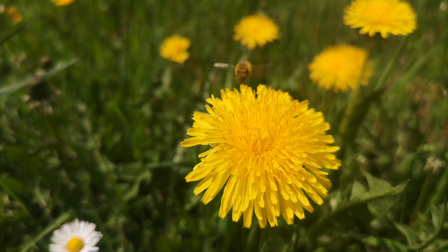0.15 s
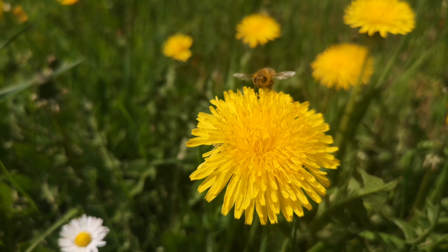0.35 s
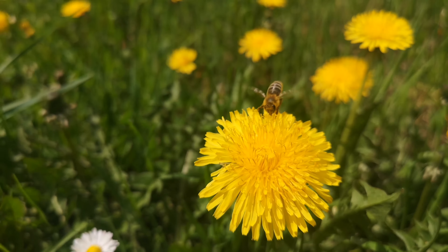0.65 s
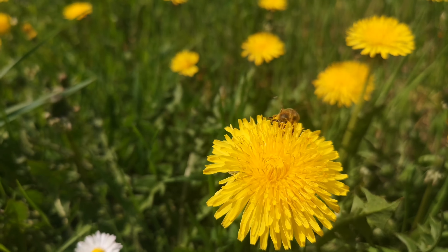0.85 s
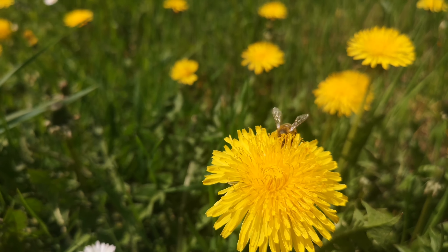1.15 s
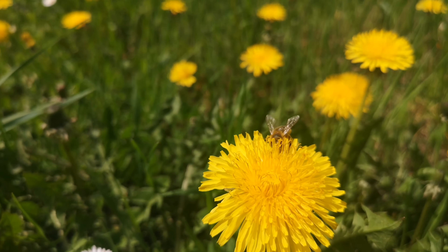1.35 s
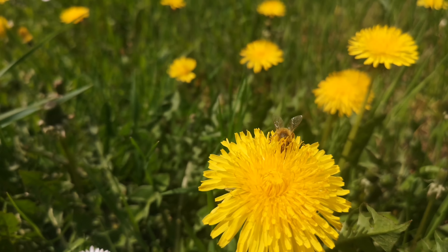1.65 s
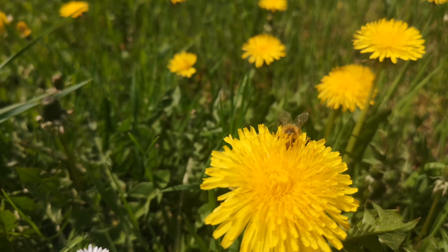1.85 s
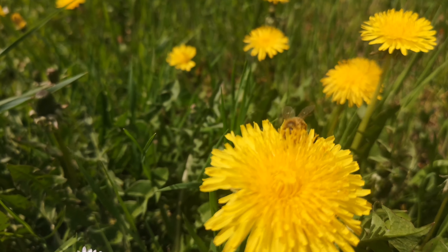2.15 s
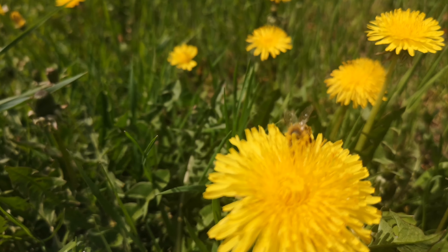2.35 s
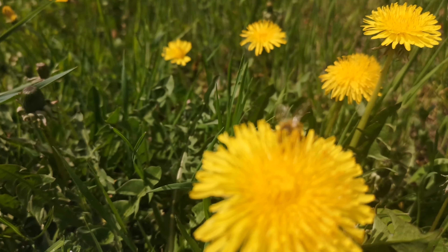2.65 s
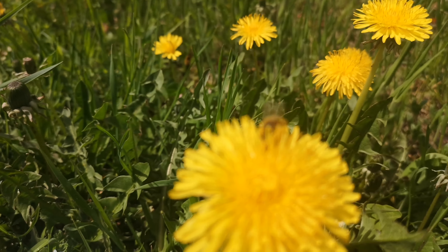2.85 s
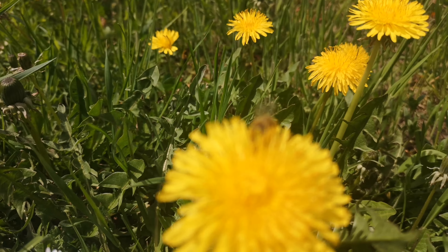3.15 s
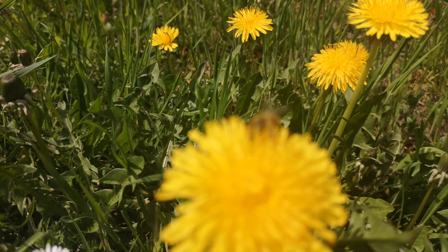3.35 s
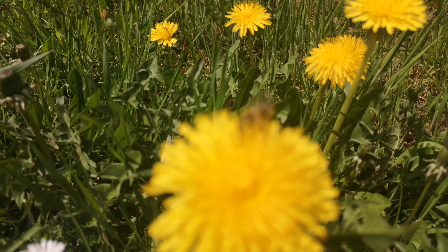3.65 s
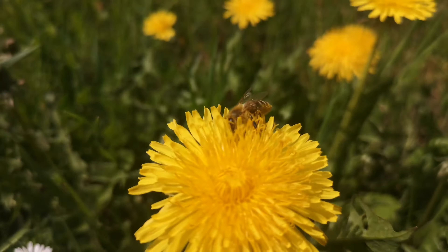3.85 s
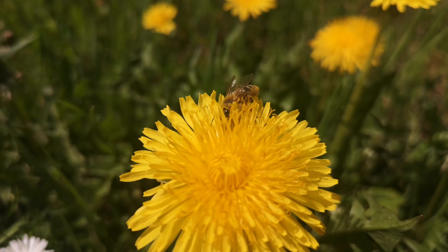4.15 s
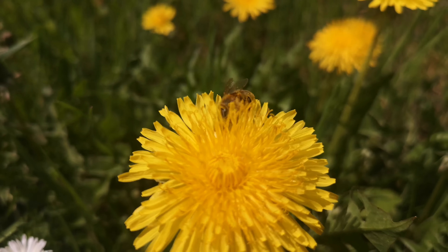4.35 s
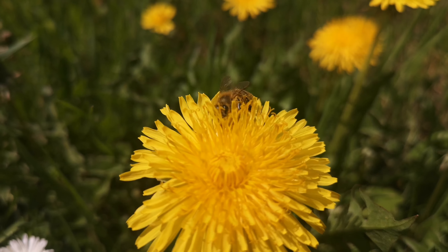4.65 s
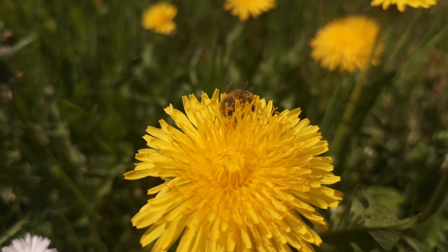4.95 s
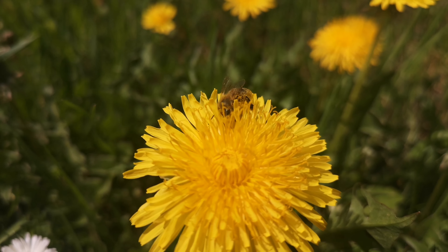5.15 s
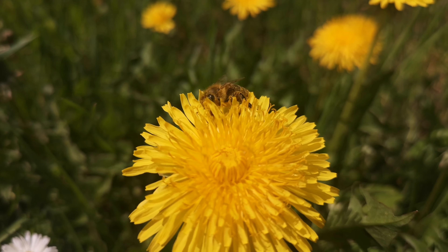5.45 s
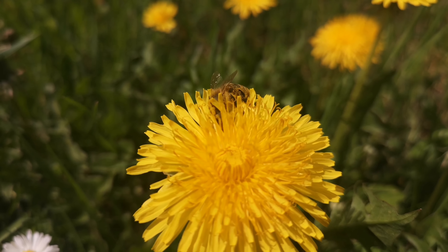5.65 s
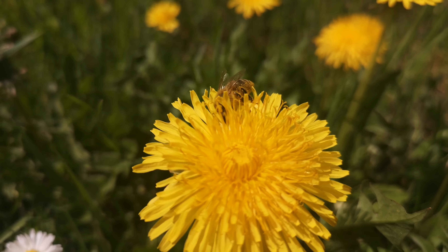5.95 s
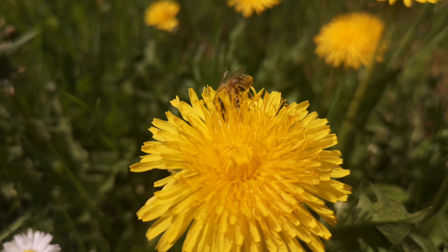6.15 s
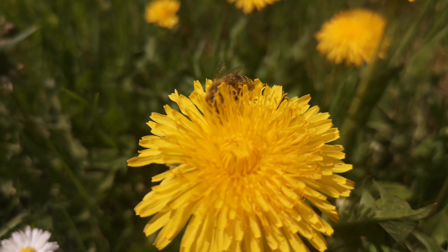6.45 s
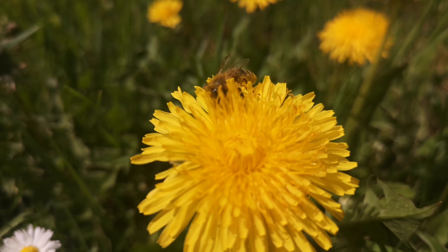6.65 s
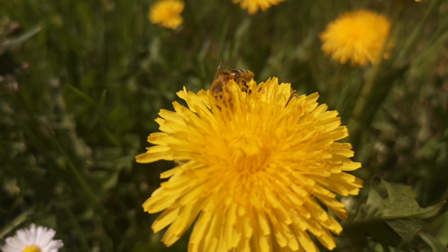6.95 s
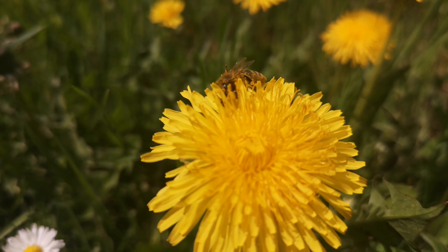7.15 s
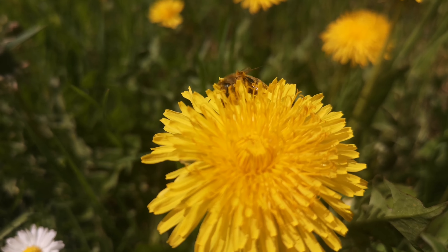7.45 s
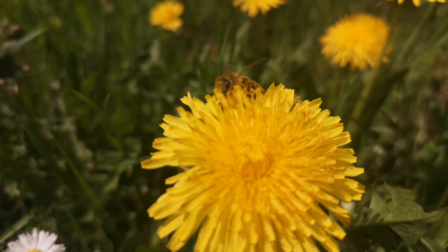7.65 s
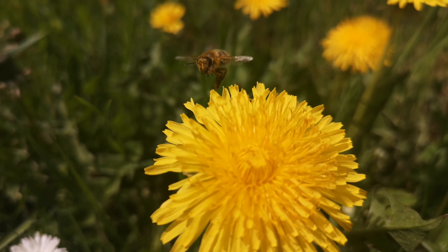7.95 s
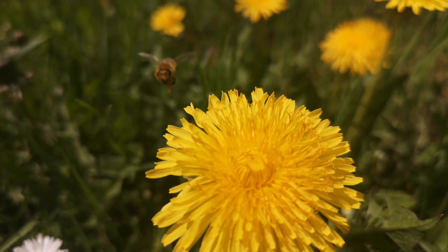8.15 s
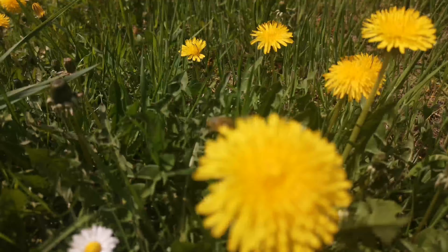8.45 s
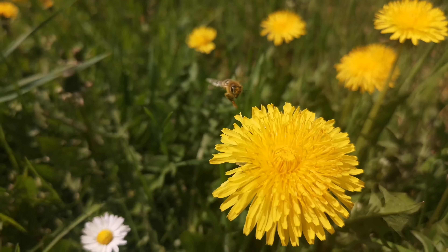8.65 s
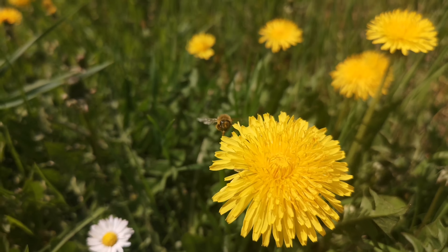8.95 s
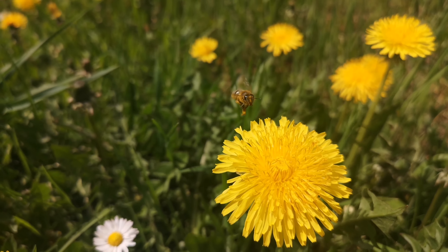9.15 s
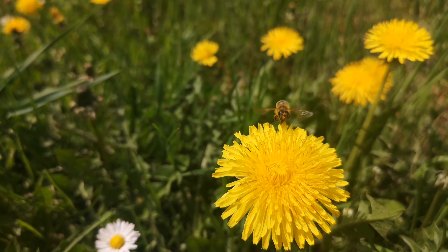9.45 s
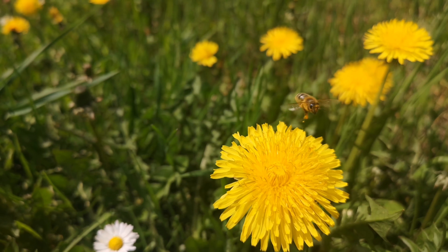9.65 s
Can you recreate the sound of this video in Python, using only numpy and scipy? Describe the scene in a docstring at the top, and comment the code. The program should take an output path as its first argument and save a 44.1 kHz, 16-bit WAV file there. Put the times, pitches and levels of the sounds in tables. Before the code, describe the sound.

Very close stereo perspective in an open meadow, with faint steady air hiss. From 0 to 2 seconds a honeybee hums near 200 hertz in fast, uneven swells, swinging left and right with a soft buzzing rasp; neighbours beat against it at slightly different pitches. Wing tips rattle at 0.2 to 0.5, with sharp cracks near 0.9, 1.5 and 1.8. More passes and a touch come at 2.5, then a broader hum and sibilant swish around 3 to 3.3. At 3.8 to 3.9 a hard cluster of cracks, dull pushes and flutter stands out. From 4 to 6.8 the buzz thins into softer passes, with a low puff near 5. At 7.1 to 7.8 it surges with rattles, thumps of air and a slow, sagging laboured buzz, stumbling until 8.5. A quiet lull follows; around 9.2 to 9.6 the hum swells again with two small hits.

```python
"""Honeybees close to a spaced pair

Honeybees work the flowers of a meadow, close to a spaced pair of microphones.
The nearest bee swells and fades as it darts about: sine hum and octave, with a rasp of wingbeat overtones.
Others hum around it at slightly different wingbeats, and one labours on slow, sagging strokes.
Wing tips rattle in noise ticks or strike with a crack and a dull push, and jolted wings flutter.
Shaped noise makes the swish of the strokes, the puffing wing wash and the faint hiss of the air."""
import sys
import numpy as np
from scipy.fft import rfft, irfft, next_fast_len
from scipy.io import wavfile
from scipy.ndimage import map_coordinates

SR = 44100
rng = np.random.default_rng(int(sys.argv[2]) if len(sys.argv) > 2 else 0)


def generate_wav(sig):
    """Save sig (samples, or channels by samples) to the path in sys.argv[1] as 16-bit PCM at SR."""
    pcm = np.round(np.clip(np.atleast_2d(sig).T, -1, 1) * 32767).astype(np.int16)
    wavfile.write(sys.argv[1], SR, pcm)


N = 431738
TIME = np.arange(N) / SR
USUAL_HZ, USUAL_DB = 200, -36  # reference wingbeat and hum level
SHUDDER_DB = 2.5  # beat-to-beat unevenness of the strokes


# Moments when the near bee faces the microphones and sounds nasal.
# Each row: centre in seconds, half length in seconds, level in dB.
NASAL_TURNS = [(1.405, .058, -60.5), (1.65, 0.031, -64.5), (2.3, 0.15, -69.5), (4.47, 0.037, -69),
               (6.8, 0.26, -79.5), (8.14, 0.23, -75)]
# The overtones of that nasal edge. Each row: frequency in Hz, relative level in dB.
NASAL_OVERTONES = [(600, -11), (1000, -0.5), (1400, -9.5), (1700, -7), (2020, -4.5), (2450, -18.5),
                   (3500, -20), (5000, -23.5)]
NASAL_DB = -81  # median of the nasal rasp that always remains, at the usual hum level


def near_bee(cycles):
    """The nearest bee swells at each pass; its rasp grows with hum and octave, and a nasal edge comes and goes."""
    hum_db, octave_db = closeness()
    _, pan_db = course()
    crowd_db, = curves(CROWD_LEVEL)
    rasp_gain = amp(octave_db - 19.0) + amp(hum_db - 32.0)
    rasp_db = decibels(rasp_gain) + 4.2 * wobble(20)
    turn = 0.38 + 0.047 * wobble(5.4)
    loose = unsteadiness()
    hum_db = hum_db + 2 * loose * wobble(30)
    octave_db = octave_db + 2 * loose * wobble(22)
    bee = wings(cycles, USUAL_HZ, hum_db, octave_db, rasp_db, turn, SHUDDER_DB * loose)
    lasting_edge = amp(NASAL_DB + crowd_db - USUAL_DB + 8.8 * wobble(9))
    edge = lasting_edge + swells(NASAL_TURNS, order=4)
    nasal = edge * rasp(cycles, USUAL_HZ, NASAL_OVERTONES)
    return panned(pan_db + 2.85 * wobble(14)) * bee + nasal


# Passes of the near bee as it darts close to the microphones, before its small random wavers.
# Each row: centre in seconds, half length in seconds, hum level in dB, octave level in dB,
# wingbeat in Hz, left-over-right level in dB.
NEAR_PASSES = [(0.046, 0.063, -30.5, -44, 204.2, 10.5), (0.218, 0.064, -37, -37.5, 208.7, -4),
               (0.351, 0.13, -34, -39, 198.5, 3.5), (0.596, 0.079, -28.5, -41, 195.4, 5.5),
               (0.692, 0.049, -45.5, -43, 206.1, 1), (0.939, 0.041, -40.5, -36, 203, -2),
               (1.01, 0.064, -33, -56, 199.4, -7), (1.398, 0.061, -33.5, -36, 195, 14.5),
               (1.64, 0.03, -39, -42, 210.6, -6), (1.788, 0.021, -33, -40.5, 193.6, 1),
               (1.878, 0.028, -28, -36.5, 189.4, -7), (2.463, 0.016, -28.5, -40.5, 207, 8),
               (2.563, 0.091, -32.5, -52, 202, 2.5), (3.118, 0.17, -37.5, -52, 204, -3),
               (3.298, 0.055, -40.5, -50, 206.1, 26), (3.786, 0.03, -33, -36, 205.2, -1.5),
               (3.914, 0.042, -36.5, -36, 201.8, 1), (4.161, 0.032, -48.5, -49, 203, 6),
               (4.477, 0.031, -33, -36.5, 210.7, 2), (4.795, 0.055, -46.5, -45.5, 208.2, 17),
               (4.951, 0.05, -36, -37, 204, -6.5), (5.334, 0.15, -44.5, -67, 199.3, 2),
               (5.627, 0.17, -44, -53.5, 196.8, -18.5), (5.824, 0.079, -36, -52.5, 198.7, -26),
               (6.339, 0.092, -50, -55.5, 206.6, 6), (6.72, 0.064, -47, -60, 208, -23),
               (6.886, 0.044, -42, -57, 204.1, -2), (7.055, 0.041, -31.5, -39.5, 212.5, -12),
               (7.213, 0.084, -35, -46, 195.4, -0.5), (7.426, 0.074, -36, -42, 197.8, -14.5),
               (7.752, 0.08, -38, -42.5, 198, -15), (7.987, 0.03, -50, -44.5, 209.7, 4.5),
               (8.332, 0.078, -45.5, -51.5, 198, -4), (8.961, 0.092, -40, -49.5, 205.8, 7),
               (9.339, 0.039, -36, -38, 208, -8), (9.437, 0.055, -33, -50, 203, -5),
               (9.602, 0.068, -34, -48.5, 204.6, -2)]


def closeness():
    """Hum and octave levels of the near bee in dB: one swell for each pass."""
    rows = np.array(NEAR_PASSES)
    hum = swells(rows[:, [0, 1, 2]])
    octave = swells(rows[:, [0, 1, 3]])
    return decibels(hum), decibels(octave)


def course():
    """Wingbeat and left-right balance of the near bee, gliding from one pass to the next."""
    *_, beat_hz, pan_db = curves(NEAR_PASSES)
    return beat_hz, pan_db


NEAR_STEADY = .4  # the unsteadiness left at close range


def unsteadiness():
    """The near bee's strokes even out while it hovers close: from 1 far away towards NEAR_STEADY."""
    hum_db, _ = closeness()
    return NEAR_STEADY + (1 - NEAR_STEADY) / (1 + amp(2 * (hum_db - USUAL_DB + 9.5)))


WAVER, FLICKER = 0.01383, 0.01684  # slow and fast share of the wingbeat, scaled by the unsteadiness


def near_wingbeat():
    """Running count of the near bee's wing strokes, its rate wavering about the course."""
    beat_hz, _ = course()
    waver = unsteadiness() * (WAVER * wobble(12) + FLICKER * wobble(40))
    return np.cumsum(beat_hz * (1 + waver)) / SR


# The wingbeat's overtones from the third up. Each row: frequency in Hz, relative level in dB.
WING_OVERTONES = [(600, 8.5), (820, 3.5), (1030, 0.5), (1400, -5), (1950, -15), (2700, -22), (5000, -38)]


def wings(cycles, beat_hz, hum_db, octave_db, rasp_db, turn, shudder_db):
    """Wings push air to and fro, so the two microphones hear one bee's hum `turn` cycles apart."""
    ears = np.array([cycles + turn / 2, cycles - turn / 2])
    hum = amp(hum_db) * tone(ears)
    octave = amp(octave_db) * tone(cycles + ears + rng.random())
    paths = cycles + (ears - cycles) * 0.17  # the overtones differ only by the short extra path
    overtones = amp(rasp_db) * rasp(paths, beat_hz, WING_OVERTONES)
    return amp(shudder_db * wobble(90)) * (hum + octave + overtones)


def tone(cycles):
    """A sine of rms 1, following a running count of cycles."""
    return np.sqrt(2) * np.sin((2 * np.pi * (cycles % 1)).astype(np.float32))


STEER_RAD, STEER_RATE = .7, 18  # drift between the two stroke shapes: depth in radians, knots a second


def rasp(cycles, beat_hz, overtones, count=28, size=2048):
    """Stroke overtones repeat each beat, wavering singly as the stroke drifts between two shapes in steering."""
    k = np.arange(3, count)
    phases = np.exp(2j * np.pi * rng.random((2, len(k))))
    lines = np.zeros((2, size // 2 + 1), complex)
    lines[:, k] = amp(along(overtones, k * beat_hz)) * phases
    first, second = unit(irfft(lines))
    place = (cycles * size).astype(int) % size
    steer = (STEER_RAD * wobble(STEER_RATE)).astype(np.float32)
    return np.cos(steer) * first[place] + np.sin(steer) * second[place]


# The bees all around the microphones, busier and calmer, before trim and random wavers.
# Each row: time in seconds, hum level in dB.
CROWD_LEVEL = [(0, -42.5), (.9, -35.5), (1.15, -44), (1.85, -38.5), (2.08, -47.5), (2.35, -46),
               (2.48, -39.5), (3.3, -38.5), (3.52, -48.5), (3.9, -42), (4.3, -49), (5.8, -45.5),
               (6.6, -52.5), (7.25, -43), (8, -53), (8.65, -53), (9.38, -39), (9.79, -44.5)]
# Base wingbeats of the neighbours, one each, in Hz.
NEIGHBOUR_BEATS = (196, 203, 207, 211)
OCTAVE_DB = -5.5  # median octave of a neighbour, relative to its hum
RASP_DB, RASP_GROWS = -55.5, 0.86  # before each bee's share, at the usual hum level; dB per dB of crowd hum
SURGE_RATE, SURGE_DB = 15, 3.5  # surges of effort: knots a second, dB per unit of effort
SURGE_PITCH = .027  # share of the wingbeat per unit of effort


def other_bees():
    """Neighbours surge louder and higher at once, each taking the lead in turn; together they follow the crowd."""
    crowd_db, = curves(CROWD_LEVEL)
    efforts = np.array([wobble(SURGE_RATE) for _ in NEIGHBOUR_BEATS])
    together_db = decibels(np.linalg.norm(amp(SURGE_DB * efforts), axis=0))
    out = np.zeros((2, N))
    for beat_hz, effort in zip(NEIGHBOUR_BEATS, efforts):
        drift = SURGE_PITCH * (effort - .8) + .014 * wobble(32) + .008 * wobble(80)
        cycles = np.cumsum(beat_hz * (1 + drift)) / SR
        share_db = SURGE_DB * effort - together_db
        hum_db = crowd_db - 2.5 + share_db + 2 * wobble(24)
        rasp_db = RASP_DB + RASP_GROWS * (crowd_db - USUAL_DB) + share_db
        rasp_db = rasp_db + 0.14 * (beat_hz - USUAL_HZ)  # faster wings rasp more
        turn = 0.27 + 0.14 * wobble(3)
        octave_db = hum_db + OCTAVE_DB + 3 * wobble(15)
        bee = wings(cycles, beat_hz, hum_db, octave_db, rasp_db, turn, SHUDDER_DB)
        out += panned(-1.2 + 4 * wobble(4.3)) * bee
    return out


# A bee off to the right, labouring on a slow, sagging wingbeat, before its random wavers and trim.
# Each row: time in seconds, wingbeat in Hz, octave level in dB.
LABOURED_BEATS = [(7.1, 205, -67), (7.17, 198, -50), (7.26, 184.9, -44.5), (7.37, 194, -46.5),
                  (7.455, 199.4, -57), (7.51, 190.6, -48.5), (7.61, 189, -48), (7.645, 174.2, -53),
                  (7.69, 196.4, -62), (7.82, 194.1, -49), (7.92, 200.7, -55), (8.04, 181.4, -71),
                  (8.08, 163.6, -56), (8.115, 192, -48), (8.17, 197.7, -46.5), (8.22, 179.3, -61),
                  (8.29, 201.5, -63), (8.38, 191.9, -52), (8.48, 198.4, -60), (8.56, 207, -80)]


def labouring_bee():
    """Slow, hard, stumbling strokes carry more octave than hum, and a rasp that follows their effort."""
    beat_hz, octave_db = curves(LABOURED_BEATS)
    cycles = np.cumsum(beat_hz * (1 + 0.008 * wobble(55))) / SR
    effort_db = octave_db + 2.8 * wobble(35)
    bee = wings(cycles, USUAL_HZ, effort_db - 4, effort_db + 1, effort_db - 11, turn=0.32, shudder_db=1)
    return panned(-5.5)[:, None] * bee


# Wing tips brushing an obstacle, before the fade and the common trim.
# Each row: start in seconds, length in seconds, tick level in dB, thud level in dB.
WING_BRUSHES = [(.195, .028, -60, -76), (.268, .046, -56, -62), (0.443, .072, -60, -66),
                (0.902, 0.025, -69, -50), (1.81, 0.024, -57.5, -58), (2.452, 0.041, -57, -69),
                (3.761, 0.033, -66, -63.5), (3.828, 0.049, -53, -53.5), (3.891, 0.022, -51, -55.5),
                (4.95, 0.03492, -63, -77), (7.15, 0.021, -56, -69), (7.189, .028, -69, -76),
                (7.234, .018, -62, -75), (7.298, 0.072, -62, -73), (7.433, .04, -62, -78),
                (7.48, 0.059, -63.5, -81), (7.565, .065, -69.5, -82), (7.705, 0.091, -69.5, -88),
                (9.155, 0.041, -65.5, -80), (9.239, 0.046, -58.5, -57.5)]
# The sharp part of a wing-tip touch. Each row: frequency in Hz, relative level in dB per Hz.
TICK_SPECTRUM = [(300, 8), (2000, -22), (4500, -4.5), (10000, -5), (15500, -12.5)]
# The dull part of a wing-tip touch. Each row: frequency in Hz, relative level in dB per Hz.
THUD_SPECTRUM = [(300, 9), (2000, 4), (5500, 0.5), (8000, -7), (15500, -34)]
STRAY_DB, STRAY_SHARE = -65.5, 0.019  # stray ticks: level before trim at the usual hum; share of the beats
TOUCH_EDGE_S = .004  # softness of a touch's start and end
TOUCH_FADE_DB = 3.5  # a touch starts hard and loses this much by its end
SCRAPE_DB = -16  # steady scrape relative to the ticks


def brushes(cycles):
    """A touching wing tip scrapes and ticks once a beat, each tick at a new strength; a few single beats graze."""
    crowd_db, = curves(CROWD_LEVEL)
    beat = cycles.astype(int)
    strays = (rng.random(size=4096) < STRAY_SHARE)[beat]
    sharp = strays * amp(STRAY_DB + crowd_db - USUAL_DB)
    dull = np.zeros(N)
    for s, length, tick_db, thud_db in WING_BRUSHES:
        near = slice(*np.searchsorted(TIME, [s - length, s + 2 * length]))
        t = (TIME[near] - s) / TOUCH_EDGE_S
        fade_db = TOUCH_FADE_DB * (.5 - (TIME[near] - s) / length)
        pressure = amp(fade_db) * (np.tanh(t) - np.tanh(t - length / TOUCH_EDGE_S)) / 2
        sharp[near] += amp(tick_db) * pressure
        dull[near] += amp(thud_db) * pressure
    strength = amp(4 * rng.standard_normal(size=4096))[beat]
    ticks = unit(amp(-26 * np.cos(2 * np.pi * cycles)) * strength)  # sharpest in mid-stroke
    contact = np.hypot(ticks, amp(SCRAPE_DB))
    touch = sharp * noise(TICK_SPECTRUM, side_db=-6.5) + dull * noise(THUD_SPECTRUM, side_db=-13)
    return amp(-2.5) * contact * touch


# Single hard hits of a wing, the crack before its trim.
# Each row: start in seconds, crack level in dB, low push level in dB.
WING_STRIKES = [(.278, -57, -41), (.452, -51, -45), (0.908, -42.5, -50), (1.462, -40, -39),
                (1.809, -52, -38), (1.848, -62, -35), (2.462, -55, -50), (3.268, -43.5, -51),
                (3.836, -38, -31), (3.854, -41, -33), (3.894, -39.5, -37), (3.906, -41.5, -31),
                (6.578, -47.5, -68), (7.138, -53, -33), (7.489, -46, -43), (7.777, -46, -46),
                (9.191, -43, -54), (9.269, -41, -41)]
CRACK_T60_S, PUSH_T60_S = 0.011, 0.034  # seconds to fall by 60 dB
PUSH_HZ, PUSH_UPPER_HZ, PUSH_UPPER_DB = 172, 382, -3  # two dull tones, both detuned together at each hit


def strikes():
    """A hard hit cracks in noise and gives a dull, quickly dying push of two tones."""
    t = np.arange(SR // 10) / SR
    crack, push = np.zeros(N), np.zeros(N)
    for s, crack_db, push_db in WING_STRIKES:
        start = round(s * SR)
        hit = slice(start, start + len(t))
        angle = 2 * np.pi * t * np.exp(0.084 * rng.standard_normal())
        tones = np.sin(PUSH_HZ * angle) + amp(PUSH_UPPER_DB) * np.sin(PUSH_UPPER_HZ * angle)
        crack[hit] += amp(crack_db - 7.0 - 60 * t / CRACK_T60_S)
        push[hit] += amp(push_db - 60 * t / PUSH_T60_S) * tones
    return crack * noise(TICK_SPECTRUM, side_db=-5.5) - push


# Moments when a bee bumps or swerves and its hum breaks up.
# Each row: centre in seconds, half length in seconds, level in dB.
BUMP_MOMENTS = [(0.476, 0.021, -40), (0.93, 0.041, -44), (2.472, 0.01, -35.5), (3.829, 0.021, -37.5),
                (3.897, 0.018, -30), (3.973, 0.019, -42), (7.16, 0.021, -39.5), (7.25, 0.016, -44.5)]
# The flutter of a jolted bee. Each row: frequency in Hz, relative level in dB per Hz.
FLUTTER_SPECTRUM = [(25, -48), (170, 15), (330, 1.5), (500, -11), (900, -16.5), (8000, -51)]


def bumps():
    """A jolted bee's wings flutter out of step for a moment, heard as low noise."""
    return swells(BUMP_MOMENTS) * noise(FLUTTER_SPECTRUM, side_db=-4.0)


# The swish of stirred air near the microphones, before it follows the strokes and the push of the wings.
# Each row: time in seconds, level in dB.
SWISH_COURSE = [(0.0, -65.5), (0.84, -63), (1.06, -64.5), (1.66, -65.5), (2.02, -69), (2.81, -66.5),
                (3.16, -63.5), (3.43, -67), (5.18, -71.5), (7.01, -72.5), (7.28, -70.5), (8.81, -80.5),
                (9.3, -69), (9.79, -74.5)]
# Stroke turbulence. Each row: frequency in Hz, relative level in dB per Hz.
SWISH_SPECTRUM = [(300, -52.5), (700, 4.5), (1200, 10.5), (2000, 6), (3000, 0), (5200, -2), (8000, -5.5),
                  (9500, -10), (15500, -13)]
# Moments when the wing strokes turn briefly sibilant, before they follow strokes and eddies.
# Each row: centre in seconds, half length in seconds, level in dB.
WHISK_MOMENTS = [(.2, 0.061, -63), (.7, 0.034, -62.5), (.78, 0.031, -62), (.93, 0.049, -68.5),
                 (2.96, 0.04, -63), (3.08, 0.049, -64.5), (3.27, 0.091, -66.5)]
# The hiss of those strokes. Each row: frequency in Hz, relative level in dB per Hz.
WHISK_SPECTRUM = [(1500, -15), (5000, -6.5), (6500, -8.5), (11000, -34)]
# Moments when the downwash hits the microphones squarely, before its random waver.
# Each row: centre in seconds, half length in seconds, level in dB.
WASH_PUFFS = [(.3, 0.069, -50), (1.38, 0.13, -46.5), (1.78, 0.17, -53), (2.48, 0.053, -46),
              (3.88, 0.063, -56), (4.96, 0.067, -45.5), (7.155, 0.032, -40.5), (7.24, 0.023, -43.5),
              (9.3, 0.24, -56)]
# Rumble of the downwash on the microphones. Each row: frequency in Hz, relative level in dB per Hz.
WASH_SPECTRUM = [(15, -5), (35, -1), (140, -11.5), (700, -17.5), (2000, -94)]
WASH_DB, WASH_GROWS = -46, 1  # downwash before its waver, at the usual push; dB per dB of push


def stirred_air(cycles):
    """Every stroke sheds a swish of turbulence; the downwash rumbles on the microphones and sometimes puffs."""
    swish_db, = curves(SWISH_COURSE)
    crowd_db, = curves(CROWD_LEVEL)
    _, octave_db = closeness()
    push_db = decibels(np.hypot(amp(crowd_db), amp(octave_db + 2.0)))
    stroke = np.cos(2 * np.pi * cycles)
    soft_strokes, sharp_strokes = unit(amp(1.9 * stroke)), unit(amp(5.9 * stroke))
    eddies_db = 1.5 * wobble(12)
    swish = amp(swish_db + 0.2 + 0.18 * (push_db - crowd_db)) * noise(SWISH_SPECTRUM, side_db=-4.0)
    whisks = swells(WHISK_MOMENTS) * noise(WHISK_SPECTRUM, side_db=-5.0)
    turbulence = amp(eddies_db) * (soft_strokes * swish + sharp_strokes * whisks)
    wash = np.hypot(amp(WASH_DB + WASH_GROWS * (push_db - USUAL_DB)), swells(WASH_PUFFS))
    rumble = wash * amp(4.7 * wobble(17)) * noise(WASH_SPECTRUM, side_db=10.5)
    return turbulence + rumble


# The open meadow behind the bees. Each row: frequency in Hz, relative level in dB per Hz.
MEADOW_SPECTRUM = [(20, 5.5), (100, -13), (300, 0), (1000, -5), (3000, -19.5), (8000, -19), (15500, -25.5)]


def meadow_air():
    """The faint, steady hiss of the open meadow is coloured noise."""
    return amp(-76.0) * noise(MEADOW_SPECTRUM, side_db=-7.5)


def noise(spectrum, side_db):
    """Coloured stereo noise of rms 1; side_db sets its width."""
    mid, side = filtered(rng.standard_normal((2, N)), lambda hz: amp(along(spectrum, hz)))
    side = amp(side_db) * side
    return unit(np.array([mid + side, mid - side]))


def swells(rows, order=2):
    """Gain swells from centre, half length and dB: bell-shaped, or flat-topped at a higher order."""
    out = np.zeros(N)
    for s, half, db in rows:
        near = slice(*np.searchsorted(TIME, [s - np.pi * half, s + np.pi * half]))
        out[near] += amp(db) * np.exp(-np.abs((TIME[near] - s) / half) ** order)
    return out


def panned(pan_db):
    """Left and right gains of constant power."""
    gains = amp(np.array([pan_db, -pan_db]) / 2)
    return gains / np.sqrt(np.mean(gains ** 2, axis=0))


def wobble(rate):
    """A smooth random curve, rate knots a second."""
    coarse = np.linspace(0, TIME[-1], num=4000)
    knots = rng.standard_normal(size=2048)
    return np.interp(TIME, coarse, map_coordinates(knots, [coarse * rate], mode="wrap"))


def curves(rows):
    """One value per sample for each column after the time."""
    s, *cols = np.transpose(rows)
    return [np.interp(TIME, s, c) for c in cols]


def along(points, hz):
    """Read (Hz, value) points on a log axis."""
    f, v = np.transpose(points)
    return np.interp(np.log(hz + 1), np.log(f + 1), v)


def filtered(x, response):
    """Multiply the spectrum of x by a response of frequency."""
    m = next_fast_len(N + SR // 4)
    return irfft(rfft(x, m) * response(np.fft.rfftfreq(m, 1 / SR)), m)[..., :N]


def amp(db):
    """Decibels to gain."""
    return 10 ** (np.asarray(db) / 20)


def decibels(gain):
    """Gain to decibels."""
    return 20 * np.log10(gain + 1e-6)


def unit(x):
    """Scale to rms 1."""
    return x / np.sqrt(np.mean(x ** 2) + 1e-20)


def scene():
    """The bees, their touches and stirred air over the faint hiss of the open meadow."""
    cycles = near_wingbeat()
    bees = near_bee(cycles) + other_bees() + labouring_bee()
    touches = brushes(cycles) + strikes() + bumps()
    return bees + touches + stirred_air(cycles) + meadow_air()


TOP_HZ = 15850


def record(dry):
    """The recorder keeps nothing above its band limit."""
    return filtered(dry, lambda hz: hz < TOP_HZ)


dry = scene()
out = record(dry)
generate_wav(out)
```